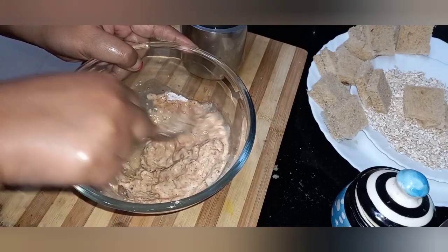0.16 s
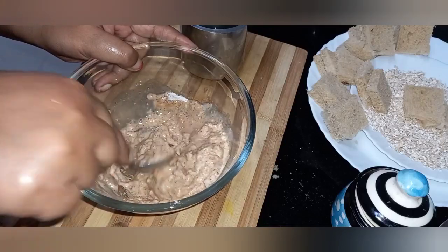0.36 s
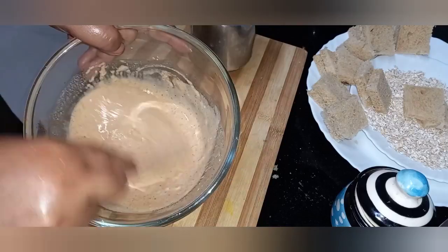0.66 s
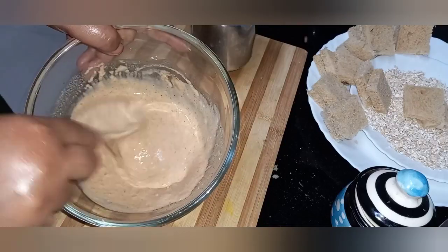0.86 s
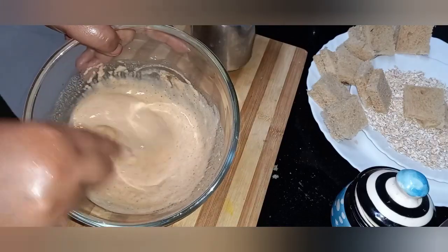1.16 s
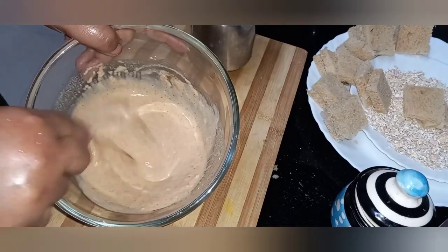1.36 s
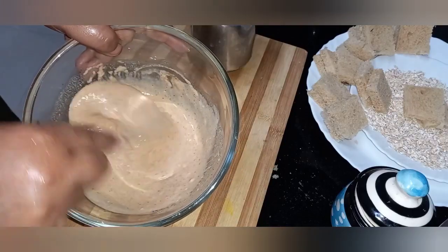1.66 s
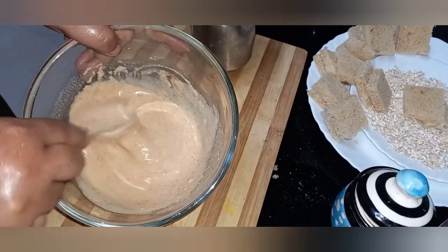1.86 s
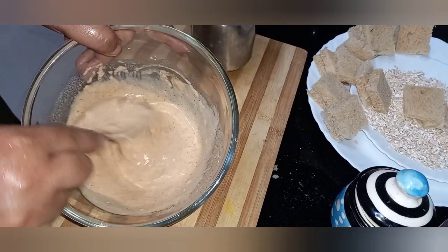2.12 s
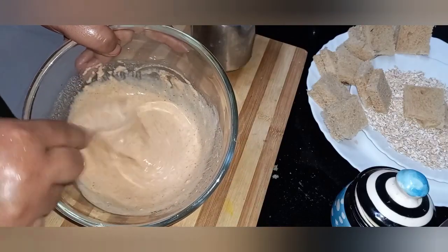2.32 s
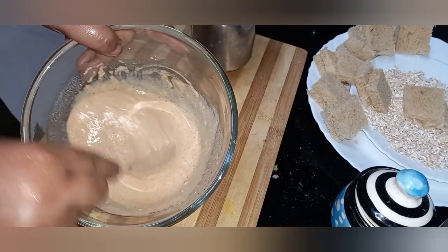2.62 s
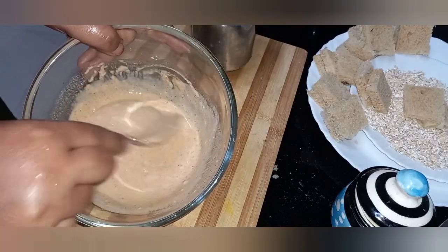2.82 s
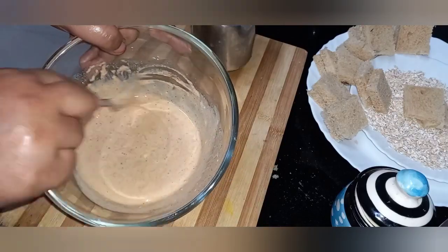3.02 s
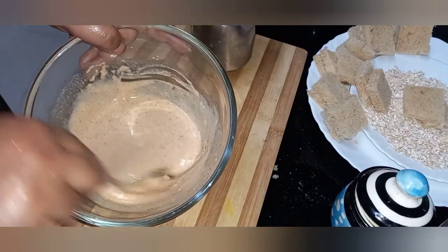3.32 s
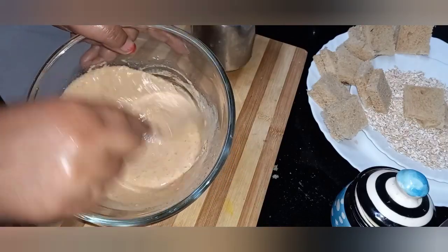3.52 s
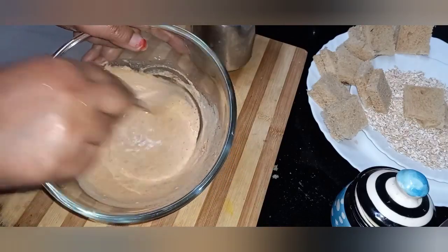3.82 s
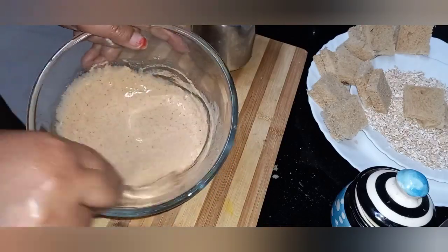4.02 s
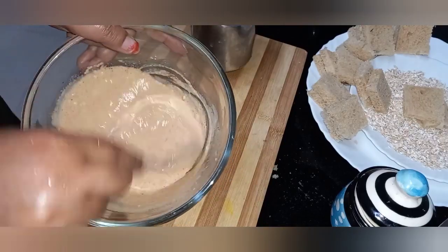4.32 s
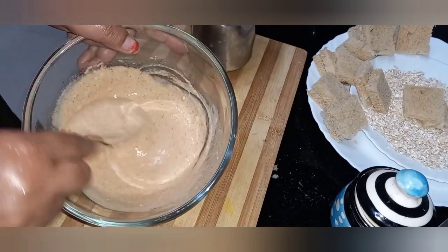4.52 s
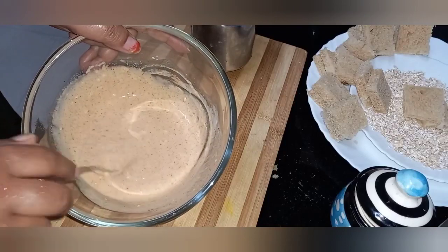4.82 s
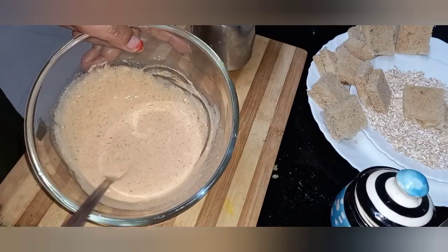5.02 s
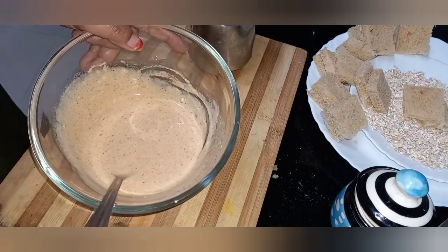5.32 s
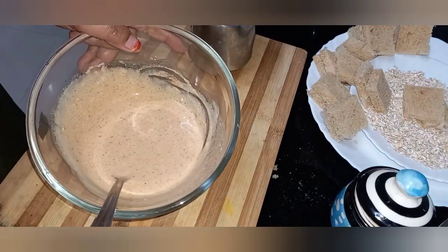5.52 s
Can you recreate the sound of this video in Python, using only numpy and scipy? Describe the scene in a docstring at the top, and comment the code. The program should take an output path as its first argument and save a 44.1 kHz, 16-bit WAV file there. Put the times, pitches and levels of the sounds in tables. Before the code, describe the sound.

A metal spoon works batter in a glass bowl on a wooden board. Soft sticky strokes come first, then about four knocks per second around two seconds, with plops and tiny bubble crackle. Light clinks and wet swishes follow, one last firm knock, and a small bouncing ring on the rim. Close microphones, short kitchen reverberation, low hum and two drone swells.

```python
"""In a small kitchen, a metal spoon beats thin batter in a glass bowl on a wooden board, close by. Struck
modes, damped by the batter, make short knocks; filtered bursts and bubble tones make squelches and plops.
Sharper clinks ring on bare glass, and at the end the spoon is laid on the rim and rings more freely. At 0.543 s
the background drops abruptly from a hollow rush of noise to a quieter room noise and a motor hum; a low drone
swells twice."""
import sys
import numpy as np
from scipy import signal
from scipy.fft import rfft, irfft, next_fast_len
from scipy.io import wavfile

SR = 44100
rng = np.random.default_rng(int(sys.argv[2]) if len(sys.argv) > 2 else 0)


def master_out(mix):
    """Clip the mix to full scale and print it as 16-bit PCM to the path in sys.argv[1]."""
    frames = np.transpose(np.atleast_2d(mix))
    ceiling = np.clip(frames, -1, 1)
    pcm = np.round(ceiling * 32767).astype(np.int16)
    wavfile.write(sys.argv[1], SR, pcm)


N = 250265


def gain_of(db):
    """Level: decibels to amplitude ratio."""
    return 10 ** (np.asarray(db) / 20)


def evened(x):
    """Normalization: scales to rms 1."""
    return x / np.sqrt(np.mean(x ** 2) + 1e-20)


def read(points, hz):
    """Interpolation of a table along a log-frequency axis."""
    f, value = np.transpose(points)
    return np.interp(np.log(hz + 1), np.log(f + 1), value)


def add(mix, s, sound):
    """Superposition: mixes a stereo sound in at time s."""
    part = mix[:, max(round(s * SR), 0):][:, :sound.shape[1]]
    part += sound[:, :part.shape[1]]


def band(x, lo_hz, hi_hz, order=3):
    """Causal Butterworth band-pass."""
    edges = [lo_hz, min(hi_hz, SR / 2 - 1)]
    return signal.sosfilt(signal.butter(order, edges, "band", fs=SR, output="sos"), x)


def pair(size, apart):
    """Partial coherence: white noise at two microphones, a shared part plus an unrelated part."""
    shared, *own = rng.standard_normal((3, size))
    return evened(shared + apart * np.array(own))


def drift(rate_hz):
    """Random modulation: a slow wander of about rms 1, from low-passed noise."""
    size = 1024
    hz = np.fft.rfftfreq(size, N / SR / size)
    slow = irfft(rfft(rng.standard_normal(size)) * np.exp(-(hz / rate_hz) ** 2))
    return np.interp(np.arange(N), np.linspace(0, N, size), evened(slow))


def weigh(parts, levels_db):
    """Spectral balance: sums the parts of a sound, each brought to its rms level over the first 10 ms."""
    total = 0
    for x, db in zip(parts, levels_db):
        early_rms = np.sqrt(np.mean(x[:, :SR // 100] ** 2) + 1e-20)
        total = total + gain_of(db) * x / early_rms
    return total


# Stereo lean of the room's own noise: pitch_hz [Hz], left_minus_right_db [dB]
LEAN = [(60, 3), (200, -1.5), (380, -10), (700, -3.5), (1300, -6.5), (2400, -1), (15000, 1)]


def leaning(hz):
    """Level difference between channels: the room's noise lies to the right in the middle range."""
    return gain_of(np.array([[1], [-1]]) * read(LEAN, hz) / 2)


# Likeness of the room noise at the two microphones: pitch_hz [Hz], correlation [0 to 1]
LIKENESS = [(60, 0.9), (300, 0.84), (650, 0.35), (1400, 0.68), (15000, 0.02)]


def air(spectrum, db):
    """Diffuse field: steady shaped noise whose left-right correlation depends on frequency."""
    size = next_fast_len(N, True)
    hz = np.fft.rfftfreq(size, 1 / SR)
    a, b = rfft(rng.standard_normal((2, size)))
    same = np.clip(read(LIKENESS, hz), -1, 1)
    z = np.array([a, same * a + np.sqrt(1 - same ** 2) * b])
    noise = irfft(z * leaning(hz) * gain_of(read(spectrum, hz)), size)[:, :N]
    return gain_of(db) * evened(noise)


# Relative spectrum of the early hollow rush: pitch_hz [Hz], density_db [dB per Hz]
EARLY_AIR = [(25, -44), (70, -8), (150, -16.5), (260, -18.5), (385, 0.5), (530, -7.5), (620, -18.5),
             (1100, -38.5), (2500, -48), (6900, -43), (7500, -53), (15000, -43)]
# Relative spectrum of the later room noise: pitch_hz [Hz], density_db [dB per Hz]
LATE_AIR = [(15, -33.5), (35, -28.5), (75, 3.5), (160, -4.5), (265, -9.5), (325, -2.5), (450, -10.5),
            (630, -11), (780, -7.5), (980, -21.5), (1200, -10), (1500, -25), (3000, -34.5), (4500, -27),
            (6900, -25.5), (7500, -40.5), (15000, -32.5)]
# Partials of the motor hum: pitch_hz [Hz], level_db [dB rms, before the lean to one side]
HUM = [(99, -71.5), (219, -69.5), (328, -69), (365, -93.5), (764, -76.5)]


def background(change_s=0.543, fade_s=0.0049, waver=0.23, wander=0.77):
    """Stationary noise and tones: the background drops abruptly from a hollow rush to room noise and a wavering
    motor hum."""
    t = np.arange(N) / SR
    later = np.clip((t - change_s) / fade_s, 0, 1)
    hum = 0
    for hz, db in HUM:
        strength = 1 + waver * drift(2.9)
        tone = strength * np.sin(2 * np.pi * hz * t + wander * drift(3.86))
        hum = hum + gain_of(db) * leaning(np.array([hz])) * evened(tone)
    return (1 - later) * air(EARLY_AIR, -52) + later * (air(LATE_AIR, -59) + hum)


# Swells of the drone: start_s [s], end_s [s], drone_db [dB rms at full swell], rumble_db [same]
SWELLS = [(1.913, 2.686, -58.5, -54.5), (4.484, 5.155, -41.5, -48)]


def drone(pitch_hz=101, rumble_hz=420, wander=0.4, waver_db=1.5, attack_s=0.22, release_s=0.12, curve=1.7):
    """Amplitude envelope: a deep tone and a low rumble swell together, hold, and drop away quickly."""
    t, out = np.arange(N) / SR, np.zeros((2, N))
    strength = gain_of(waver_db * drift(9.7))
    tone = evened(strength * np.sin(2 * np.pi * pitch_hz * t + wander * drift(2.6)))
    low_pass = signal.butter(2, rumble_hz, fs=SR, output="sos")
    rumble = evened(signal.sosfiltfilt(low_pass, air(LATE_AIR, -59)))
    for start, end, tone_db, rumble_db in SWELLS:
        rise = np.clip((t - start) / attack_s, 0, 1) ** curve
        fall = np.clip((end - t) / release_s, 0, 1)
        out += rise * fall * (gain_of(tone_db) * tone + gain_of(rumble_db) * rumble)
    return out


# Reverberation of the kitchen: pitch_hz [Hz], t60_s [s]
KITCHEN = [(300, 0.42), (1000, 0.36), (2000, 0.37), (5500, 0.34), (10000, 0.26), (15000, 0.2)]
# Relative colour of the reflections: pitch_hz [Hz], level_db [dB]
KITCHEN_COLOUR = [(300, 10), (1000, 3.5), (2000, 3), (5000, -1.5), (10000, 3.5), (15000, 9)]


def kitchen(x, first_s=0.003, build_s=0.0042, reflections_per_s=5000):
    """Reverberation: dense reflections from worktop and tiles, each band dying at its own speed."""
    size = SR // 2
    taps = rng.standard_normal((2, size)) * (rng.random((2, size)) < reflections_per_s / SR)
    hz, t, z = signal.stft(taps, SR, nperseg=256)
    decay_db = -60 * t / read(KITCHEN, hz)[:, None]
    z = z * gain_of(read(KITCHEN_COLOUR, hz)[:, None] + decay_db)
    tail = signal.istft(z, SR, nperseg=256)[1][:, :size]
    tail = tail * np.clip((np.arange(size) / SR - first_s) / build_s, 0, 1)
    tail = tail / np.linalg.norm(tail, axis=1, keepdims=True)
    return signal.fftconvolve(x, tail, axes=1)[:, :N]


# Frequency response of both microphones: pitch_hz [Hz], level_db [dB]
MICROPHONE_COLOUR = [(6900, 0.5), (7500, -7.5), (8200, -5), (9200, 0.5), (13000, -0.5)]


def microphones(x, left_lag_s=3e-5):
    """Arrival-time difference: the sound reaches the left a hair later; both sides dip in the treble."""
    size = next_fast_len(N, True)
    hz = np.fft.rfftfreq(size, 1 / SR)
    lag = np.exp(-2j * np.pi * hz * np.array([[left_lag_s], [0]]))
    return irfft(rfft(x, size) * lag * gain_of(read(MICROPHONE_COLOUR, hz)), size)[:, :N]


def froth(db=-73, pops_per_s=70, size_db=3, decay_s=0.0019):
    """Random impulse process: tiny bubbles burst all the while the thin batter moves."""
    sizes = gain_of(size_db * np.minimum(rng.exponential(1, N), 3))
    bursts = sizes * (rng.random(N) < pops_per_s / SR)
    pops = signal.lfilter([1], [1, -np.exp(-1 / (decay_s * SR))], bursts) * pair(N, apart=0.7)
    moving = np.interp(np.arange(N) / SR, [0.54, 0.6, 4.4, 5.1], [0, 1, 1, 0])
    return gain_of(db) * evened(band(pops, 1300, 12000, order=1)) * moving


# The spoon dragging through the batter: middle_s [s], half_length_s [s], level_db [dB],
# pitch_hz [Hz, of the hollow], fizz_db [dB over the hollow's tone]
DRAGS = [(0.037, 0.024, -52.5, 4140, 12), (0.131, .12, -66, 3360, 6), (0.567, 0.013, -49, 1800, -1.5),
         (0.831, 0.028, -57.5, 2670, -2), (1.093, 0.028, -55.5, 2940, 7), (1.355, .014, -43.5, 2400, -1),
         (1.603, 0.017, -38.5, 1850, 0), (3.39, 0.066, -45.5, 1716, -0.5), (3.447, 0.021, -38.5, 1620, 1),
         (3.744, .022, -41, 1700, 2), (3.797, .0091, -39, 1780, 0.5), (3.846, .028, -48.5, 1860, -3),
         (4.174, 0.028, -41.5, 1940, -19), (4.219, .016, -32.5, 1680, -2)]


def drags(snaps_per_s=2600, width=0.14, glide=0.046, fizz_spread=2.26, slosh_db=-17, grain_db=1.0):
    """Stick-slip and cavity resonance: sticky snaps excite the hollow behind the spoon, with fizz and slosh."""
    out, size = np.zeros((2, N)), SR // 2
    for s, half_s, db, hz, fizz_db in DRAGS:
        t = np.arange(size) / SR - min(s, 3 * half_s)
        snaps = pair(size, apart=0.5) * (rng.random(size) < snaps_per_s / SR)
        snaps = snaps * gain_of(grain_db * rng.standard_normal(size))
        # the hollow rises in pitch as the batter closes in on it
        rise = np.exp(2j * np.pi * np.cumsum(hz * glide * np.tanh(t / half_s)) / SR)
        resonance = band(snaps, hz / (1 + width), hz * (1 + width), order=2)
        hollow = evened((signal.hilbert(resonance) * rise).real)
        fizz = band(snaps, hz / fizz_spread, hz * fizz_spread, order=1)
        fizz = evened(band(fizz, 720, 5140, order=2))
        slosh = evened(band(snaps, 450, 830, order=3))
        swell = np.exp(-(t / half_s) ** 2)
        stroke = (hollow + gain_of(fizz_db) * (fizz + gain_of(slosh_db) * slosh)) * swell
        add(out, s + t[0], gain_of(db) * evened(stroke) * np.sqrt(np.mean(swell ** 2)))
    return out


# Air pockets opening in the batter: start_s [s], level_db [dB at the onset, before the soft rise],
# pitch_hz [Hz at the onset], t60_s [s]
PLOPS = [(0.581, -19, 1667, 0.029), (0.7499, -37.5, 993, 0.063), (0.7664, -27.5, 997, 0.042),
         (1.358, -34.5, 1663, 0.042), (1.541, -27.5, 1022, 0.059), (1.593, -37, 1760, 0.034),
         (2.23, -15.5, 1180, 0.034), (2.4462, -16.5, 2900, 0.0029), (3.308, -34.5, 1000, 0.028),
         (3.5091, -29, 1790, 0.012), (3.8322, -19.5, 1833, 0.011), (4.3274, -32, 1600, 0.015)]


def plops(glide=0.81, rise_s=0.00023):
    """Bubble resonance: an air pocket rings as a decaying sine, its pitch creeping up as it opens."""
    t, out = np.arange(SR // 10) / SR, np.zeros((2, N))
    for s, db, hz, t60 in PLOPS:
        envelope = gain_of(db - 60 * t / t60) * (1 - np.exp(-t / rise_s))
        bubble = envelope * np.sin(2 * np.pi * hz * t * (1 + glide * t))
        add(out, s, np.array([bubble, bubble]))
    return out


# Wet films slapping (low) and snapping (high): start_s [s], level_db [dB rms over 10 ms],
# pitch_hz [Hz, band centre], half_width [octaves]
SMACKS = [(0.0496, -26.5, 3500, 0.25), (0.364, -58.5, 5340, .25), (0.546, -56, 12000, 0.28),
          (0.582, -27.5, 1880, 0.16), (0.706, -44, 6100, 0.4), (0.718, -37.5, 12500, 0.64),
          (0.7666, -45.5, 2450, 0.88), (0.97, -52, 6470, 0.088), (1.05, -47.5, 11900, .4),
          (1.55, -38.5, 2640, .9), (1.7318, -43.5, 6300, 0.16), (1.996, -41.5, 6080, 0.22),
          (2.221, -37.5, 2650, 2.7), (2.4435, -42, 3500, 0.73), (3.4417, -32, 1940, 0.6),
          (3.5475, -40.5, 1680, 0.074), (3.5905, -50, 7500, 0.45), (3.7123, -36.5, 1400, 0.083),
          (3.724, -38.5, 1500, 0.8), (3.787, -39.5, 1150, 0.43), (3.867, -50, 1790, 1.8),
          (4.2113, -27.5, 1850, 0.41), (4.3269, -38, 1860, 0.45), (4.409, -37, 12400, .5),
          (4.615, -54.5, 6060, 0.13), (5.0534, -48.5, 11000, 0.47)]


def smacks(fade_s=0.004, grain_db=4, lowest_hz=600, reach=3.2):
    """Filtered burst: a wet film lets go in quick uneven snaps, coloured by the gap that it opens."""
    t, out = np.arange(SR // 10) / SR, np.zeros((2, N))
    for s, db, hz, octaves in SMACKS:
        grain = gain_of(grain_db * rng.standard_normal(len(t)))
        snaps = pair(len(t), apart=0.68) * grain * np.exp(-t / fade_s)
        gap = band(snaps, hz / 2 ** octaves, hz * 2 ** octaves, order=1)
        add(out, s, weigh([band(gap, lowest_hz, hz * reach, order=2)], [db]))
    return out


def ring(modes, t, detune, spread):
    """Modal vibration, as (channel, mode, time); higher modes differ more in phase between microphones."""
    hz, db, t60 = np.transpose(modes)[:, :, None]
    shift, lag = rng.standard_normal((2, len(modes), 1))
    phase = np.array([lag, -lag]) * spread * np.sqrt(hz / hz[0])
    return gain_of(db - 60 * t / t60) * np.sin(2 * np.pi * hz * (1 + detune * shift) * t + phase)


# Frequency registers in which a blow is balanced: low_hz [Hz], high_hz [Hz]
REGISTERS = [(700, 1400), (1400, 2400), (2400, 4000), (4000, 7200), (8800, 15000)]


def blows(rows, balance_db, modes, lowest_hz, crack_db, crack_s, detune, spread, thud_db):
    """Impact excitation: each contact cracks and rings the modes; less cushioning makes it brighter."""
    release_s, grip_fade_s, free_ring_db = 4.8, 0.017, 4  # the hand lets go of the spoon at release_s
    t, out = np.arange(SR // 4) / SR, np.zeros((2, N))
    register = np.searchsorted([lo for lo, hi in REGISTERS[1:]], [mode[0] for mode in modes])
    for s, db, bright_db in rows:
        # brightness tilts the balance about the middle register
        levels_db = [db + own_db + bright_db * (k - 2) for k, own_db in enumerate(balance_db)]
        # while the hand still grips the spoon, it soaks up the ringing
        grip = np.exp(-t / grip_fade_s) if s < release_s else gain_of(free_ring_db)
        rings = ring(modes, t, detune, spread) * grip
        crack = gain_of(crack_db) * pair(len(t), apart=1.0) * np.exp(-t / crack_s)
        parts = [rings[:, register == k].sum(1) + band(crack, *edges) for k, edges in enumerate(REGISTERS)]
        # each blow is band-limited: little sounds below lowest_hz or above 13.5 kHz
        parts = list(band(np.array(parts), lowest_hz, 13500, order=5))
        # the board under the bowl takes the blow as a dull thud
        thud = band(pair(len(t), apart=0.13) * np.exp(-t / 0.00033), 240, 520, order=3)
        add(out, s, weigh(parts + [thud], levels_db + [levels_db[0] + thud_db]))
    return out


# Spoon against bare glass, then bouncing to rest on the rim:
# start_s [s], level_db [dB, before the register balance], brightness_db [dB per register]
CLINKS = [(2.9618, -38.5, -1), (3.2696, -44, 1), (4.8205, -35.5, 0.5), (4.834, -46, -2.5),
          (4.847, -44.5, 0), (4.9445, -49.5, -0.5)]
# Balance of a clink, one value per register: level_db [dB]
CLINK_BALANCE = [-2.5, 1.5, 1, 6.5, -2.5]
# Modes of the spoon on glass: pitch_hz [Hz, before detuning], level_db [dB, relative],
# t60_s [s, without the hand's damping]
SPOON = [(780, -7, 0.054), (1020, -8, 0.041), (1320, -11, 0.073), (1603, -3.5, 0.036), (1863, 1.5, 0.045),
         (2400, -9, .035), (2760, -4, 0.026), (3288, -4, 0.096), (4140, -2, 0.031), (5050, 2, 0.072),
         (5155, -1, 0.12), (6720, -1, 0.027), (7480, 0, 0.088), (10330, 1.5, 0.062), (11150, -11, .03),
         (12740, -5, 0.041)]


def clinks():
    """Lightly damped modes: the spoon rings on bare glass, strongest against its crack once let go."""
    return blows(CLINKS, CLINK_BALANCE, SPOON, lowest_hz=730, crack_db=14.5, crack_s=0.0012,
                 detune=0.0049, spread=0.6, thud_db=-13.5)


# Spoon against the batter-filled bowl, at its busiest about four beats a second:
# start_s [s], level_db [dB, before the register balance], brightness_db [dB per register]
KNOCKS = [(0.0494, -36.5, 3.5), (0.582, -41, 2), (1.007, -44, -2), (1.259, -35.5, -0.1),
          (1.5262, -34, -0.4), (1.784, -25.5, -0.2), (2.0372, -24, 1.3), (2.258, -19, 0.7),
          (2.4767, -21, 0.6), (2.6972, -22.5, -.5), (4.41, -25.5, 1.8), (4.742, -56, -7.5)]
# Balance of a knock, one value per register: level_db [dB]
KNOCK_BALANCE = [1, -1, -7.5, -2, -14]
# Modes of the bowl, damped by the batter: pitch_hz [Hz, before detuning], level_db [dB, relative],
# t60_s [s, without the hand's damping]
BOWL = [(900, -19, 0.034), (936, -8.5, 0.056), (1000, 5, 0.024), (1151, 4, 0.021), (1114, -6.5, 0.013),
        (1694, 8.5, .016), (1879, 7, 0.048), (1960, -13, .018), (2781, -7, 0.044), (3750, -7, 0.024),
        (4570, 6, 0.014), (5233, 16, 0.0039), (5120, -13.5, 0.0018), (6820, -6.5, .01), (10160, -9, 0.03),
        (11600, -3, 0.0085)]


def knocks():
    """Heavily damped modes: the batter shortens the bowl's ringing to a knock."""
    return blows(KNOCKS, KNOCK_BALANCE, BOWL, lowest_hz=918, crack_db=11.0, crack_s=0.0034,
                 detune=0.0087, spread=0.39, thud_db=-25.5)


def scene():
    """Superposition of spoon, bowl and batter, their reflections, and the room behind them."""
    knocking, clinking = knocks(), clinks()
    batter = smacks() + plops() + drags() + froth()
    echo = kitchen(gain_of(-5.0) * knocking + gain_of(-1.5) * clinking + gain_of(-6.0) * batter)
    return microphones(knocking + clinking + batter + echo) + background() + drone()


def record(dry, edge_hz=16400):
    """Clipping and band limit: peaks are held at full scale, then a low-pass removes the top treble."""
    low_pass = signal.firwin(255, edge_hz, window=("kaiser", 9), fs=SR)
    return signal.oaconvolve(np.clip(dry, -1, 1), low_pass[None], "same")


dry = scene()
out = record(dry)
master_out(out)
```